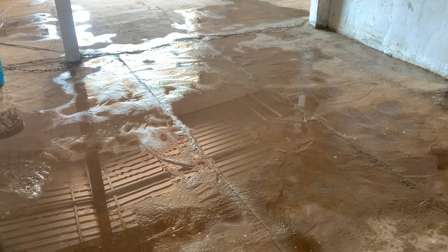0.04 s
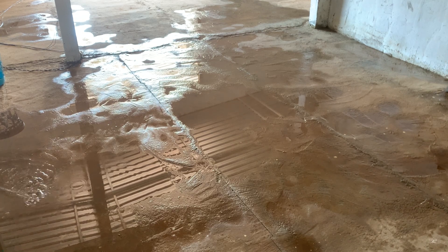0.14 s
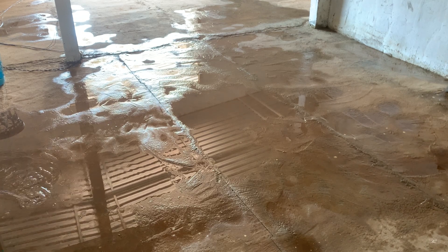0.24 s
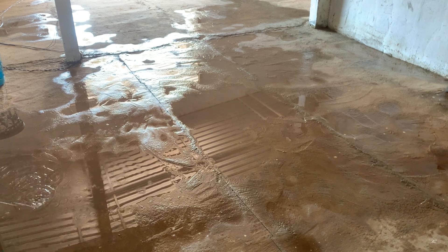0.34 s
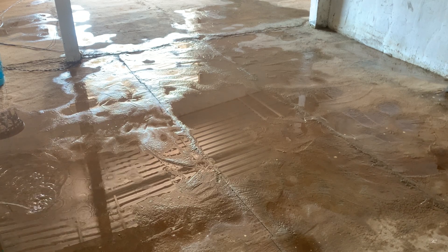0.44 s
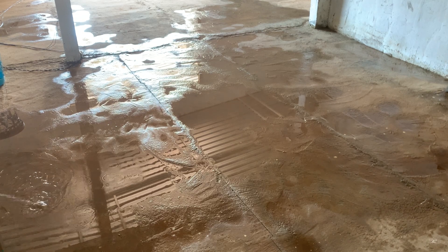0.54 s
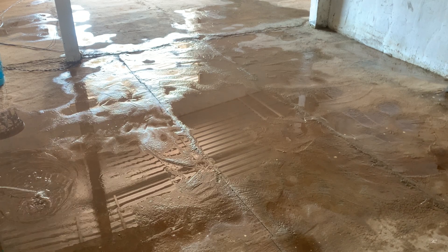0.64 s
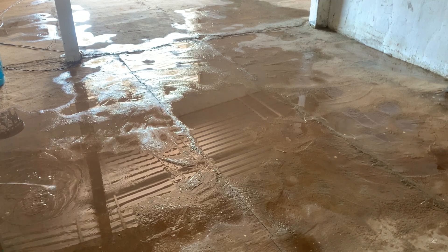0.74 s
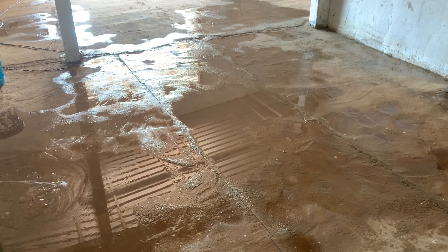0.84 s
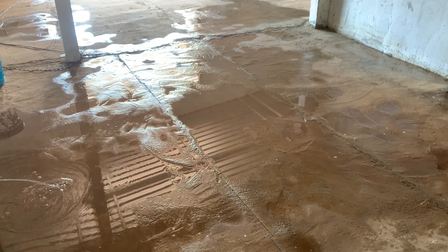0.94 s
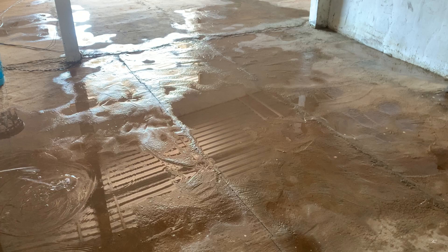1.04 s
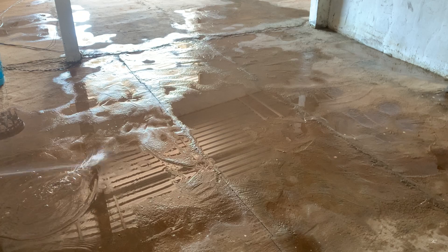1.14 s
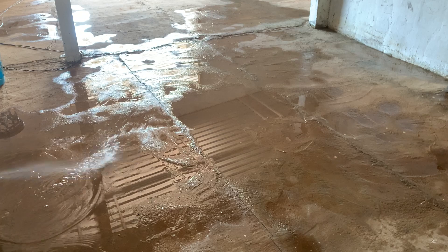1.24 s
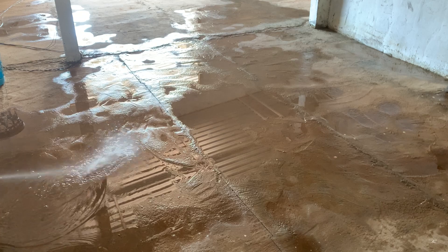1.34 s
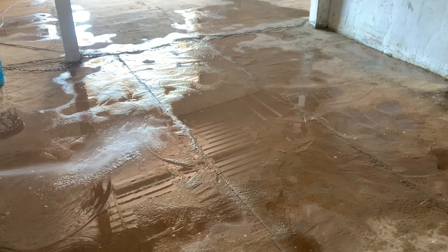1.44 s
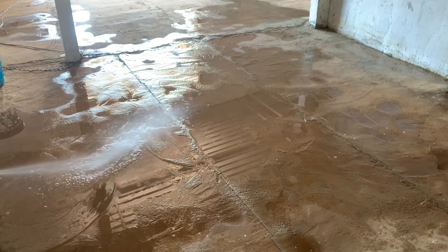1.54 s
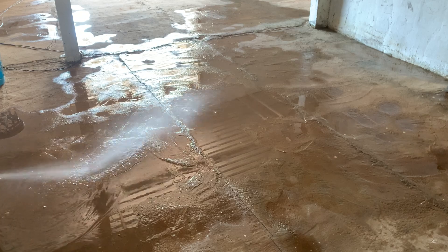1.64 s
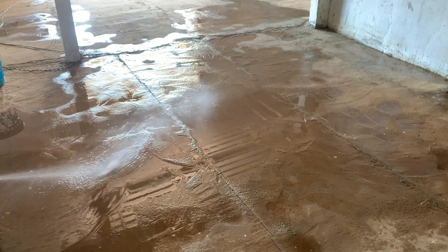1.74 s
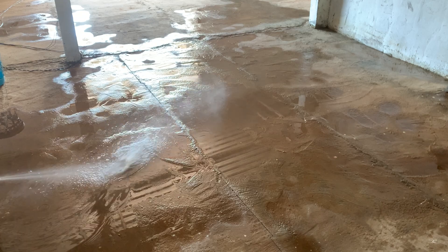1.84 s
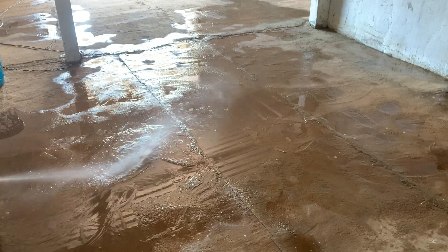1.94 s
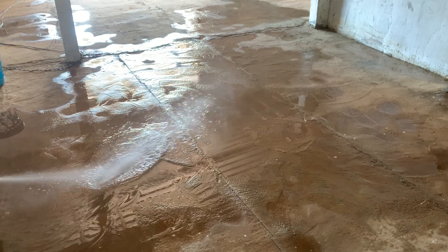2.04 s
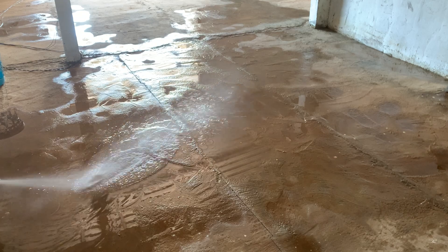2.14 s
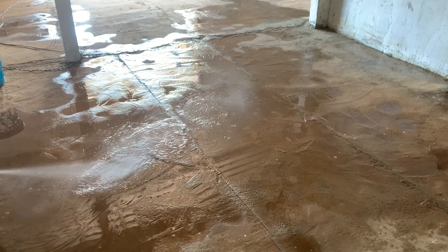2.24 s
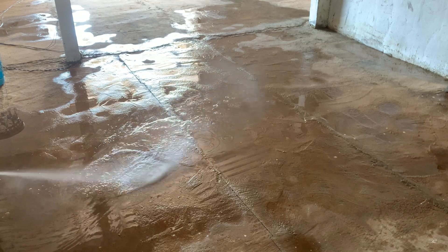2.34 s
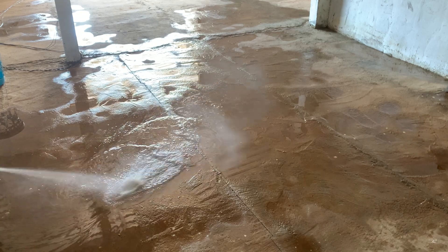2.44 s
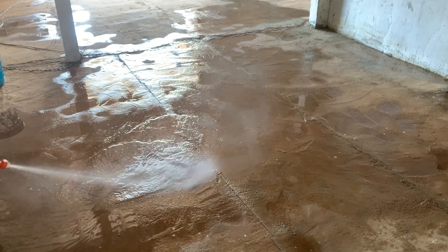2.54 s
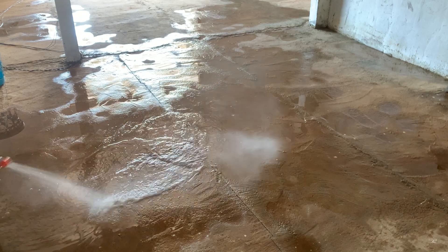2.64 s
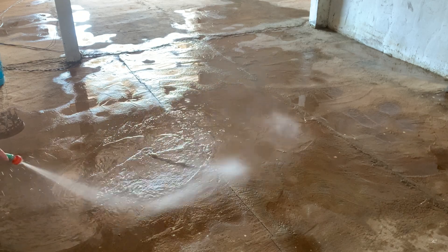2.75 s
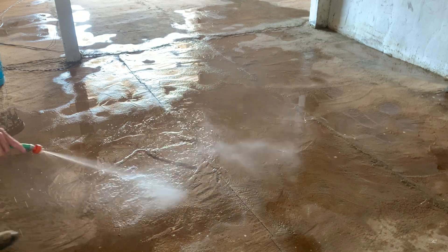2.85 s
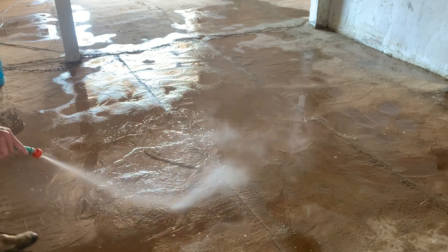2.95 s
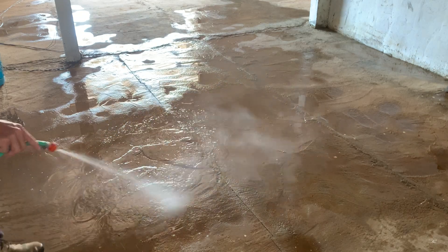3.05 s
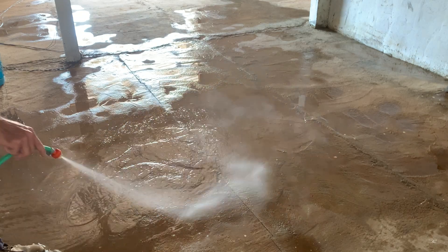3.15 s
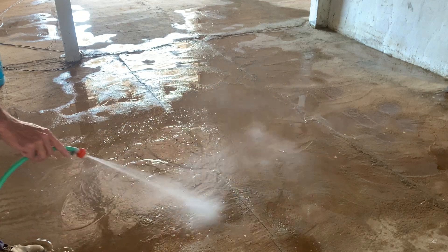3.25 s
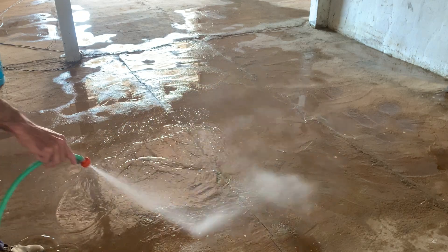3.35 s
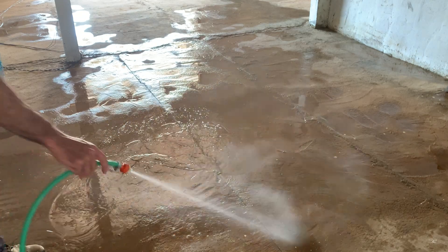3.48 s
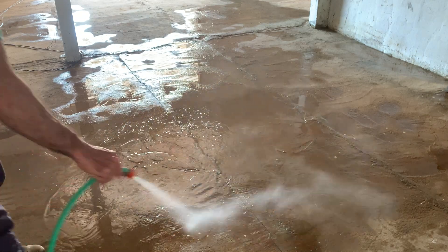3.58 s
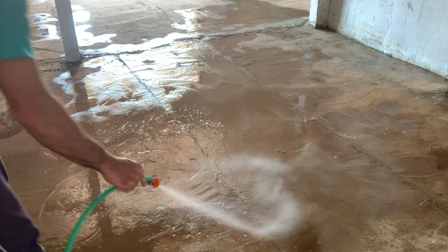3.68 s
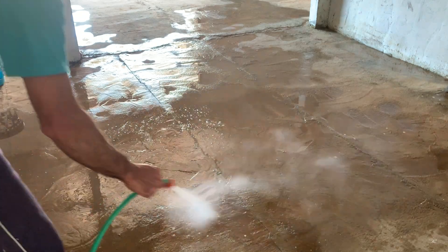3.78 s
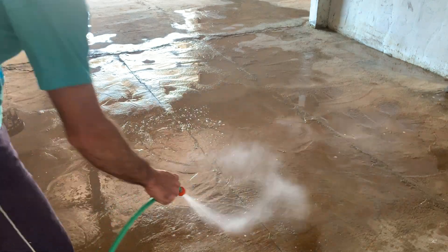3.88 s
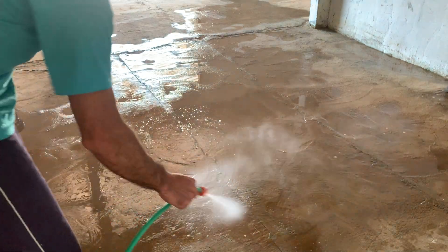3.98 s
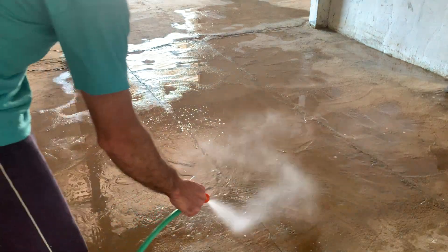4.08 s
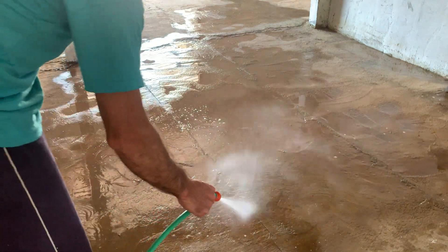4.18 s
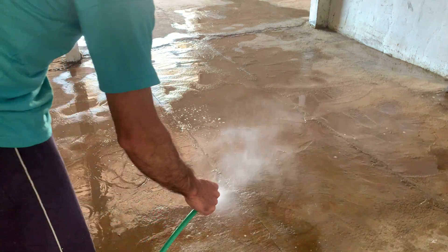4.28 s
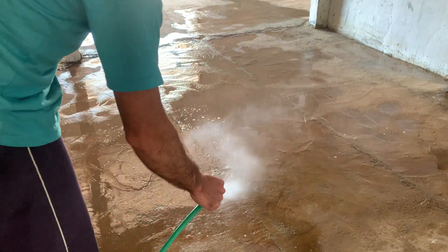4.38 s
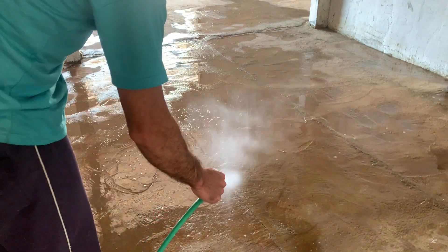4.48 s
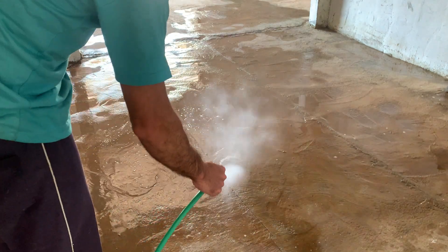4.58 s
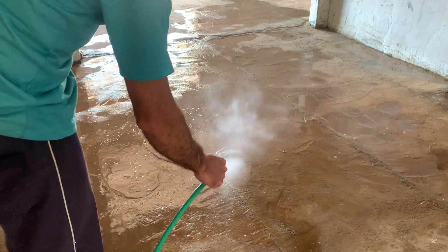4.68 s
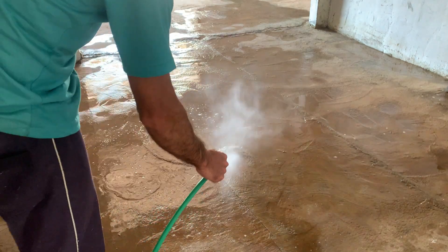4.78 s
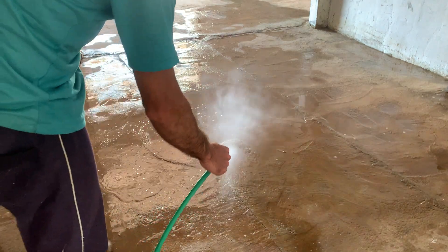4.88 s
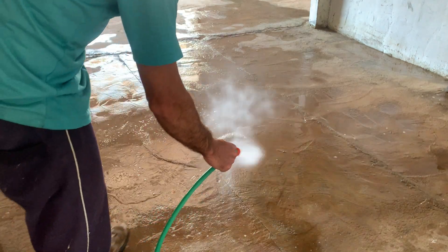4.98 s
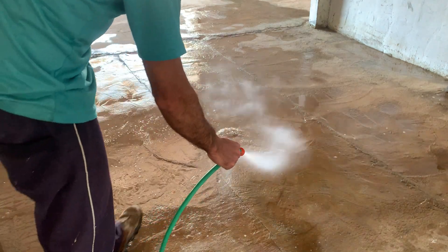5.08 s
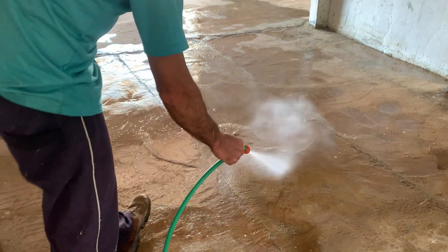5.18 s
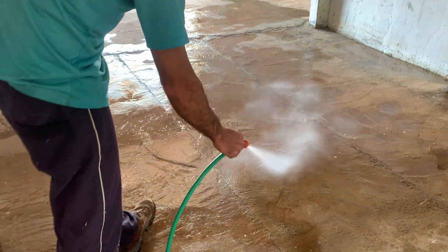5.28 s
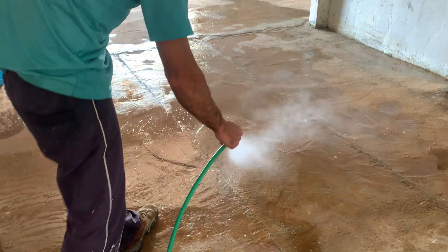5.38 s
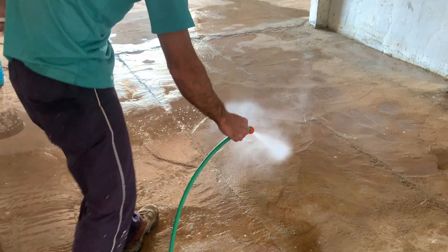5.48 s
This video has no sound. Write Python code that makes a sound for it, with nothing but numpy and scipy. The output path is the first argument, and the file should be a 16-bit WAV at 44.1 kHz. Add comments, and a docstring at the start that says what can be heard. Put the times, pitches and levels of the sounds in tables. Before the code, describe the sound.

Water dribbles and ticks on a wet concrete floor, then a pressure washer kicks in, whines up and blasts a steady hissing jet.

```python
"""Water dribbles and ticks on a wet concrete floor over low rumble and a dying hiss; then a pressure washer starts.
Dribble and jet are random impulse showers through spectral filters; drops and spits are ringing noise bursts.
Pump and motor tones are sines on one shaft-speed curve, with filtered noise for churning water and casing rush.
The jet hisses, sizzles and spits; short reflections comb the steady noise, decaying noise echoes the dribble and drops."""
import sys
import numpy as np
from scipy import signal
from scipy.fft import rfft, irfft, next_fast_len
from scipy.io import wavfile
from scipy.ndimage import map_coordinates

SR = 44100
rng = np.random.default_rng(int(sys.argv[2]) if len(sys.argv) > 2 else 0)


def generate_wav(signal):
    """Clip the signal to [-1, 1] and save it as 16-bit WAV at the path in sys.argv[1]."""
    frames = np.transpose(np.atleast_2d(signal))
    scaled = np.clip(frames, -1, 1) * 32767
    pcm = np.round(scaled).astype(np.int16)
    wavfile.write(sys.argv[1], SR, pcm)


N = 243431
T = np.arange(N) / SR

# Dribble on wet floor: (frequency [Hz], relative density [dB/Hz])
DRIBBLE_SPECTRUM = [(300, -13), (1000, 0), (2400, 2.5), (4000, 5.5), (5200, 2), (7500, 3.5), (10500, 2),
                    (14000, -17), (15000, -30)]
# Hiss dying away: (frequency [Hz], relative density [dB/Hz])
FADING_SPECTRUM = [(40, -15), (130, -6), (300, 9), (450, 4.5), (700, 2.5), (1200, -1.5), (2800, 0),
                   (4200, -2.5), (6000, -17), (12000, -18)]
# Water swishing over the floor: (frequency [Hz], relative density [dB/Hz])
SWISH_SPECTRUM = [(120, -7), (300, 5), (450, 4), (800, 0), (1200, -3), (1600, -5), (2100, -24), (6000, -35)]
# Building rumble: (frequency [Hz], relative density [dB/Hz])
RUMBLE_SPECTRUM = [(12, -40), (25, -21), (42, -7), (62, 5.5), (95, -6), (170, -9), (290, -18), (450, -28),
                   (4000, -49)]
# Single drops: (time [s], direct peak [dB], pitch [Hz], filter width [Hz], excitation decay [s])
DROP_EVENTS = [(.181, -35, 9500, 9000, .0008), (.258, -42, 7000, 6000, .001),
               (.361, -30.5, 8000, 11000, .0008), (.418, -38.5, 5000, 2000, .003),
               (.425, -43, 12000, 7000, .0005), (.491, -44, 10000, 6000, .0005),
               (.529, -45, 5000, 2000, .002), (.602, -44, 7500, 3000, .001), (.625, -42, 9500, 8000, .0005),
               (.682, -39, 4800, 3500, .002), (.729, -33, 5400, 2200, .002), (.731, -38, 9000, 6000, .0015),
               (.869, -44, 4500, 2500, .003), (.879, -43, 13100, 5000, .0008),
               (1.011, -31, 10000, 5000, .001)]
# Nozzle spits: (time [s], direct peak [dB], pitch [Hz], excitation decay [s])
SPIT_EVENTS = [(1.123, -24.5, 13600, .02), (1.143, -20, 13800, 0.043), (1.177, -17, 13200, 0.049),
               (1.55, -24, 12000, 0.038), (1.674, -20, 12980, .018), (1.732, -19, 11500, 0.024),
               (2.175, -26, 11000, .04), (2.348, -11.5, 11600, 0.0067), (2.362, -19.5, 11270, 0.034),
               (2.49, -25, 10510, .04), (2.69, -25, 12000, .02)]
# Pump shaft speed: (time [s], speed [turns/s])
PUMP_SPEED = [(.93, 29.46), (1.0, 49.54), (1.15, 60), (1.3, 66.26), (1.43, 70.54), (1.64, 73.46),
              (1.9, 72.86), (2.35, 72.92), (2.9, 73.4), (5.52, 73.52)]
# Piston hum at shaft multiples 1, 2, 3: (time [s], first [dB], second [dB], third [dB])
HUM_LEVELS = [(.95, -58, -49, -47), (1.12, -44, -45, -55), (1.23, -38, -48, -55), (1.31, -31, -43, -53),
              (1.39, -27, -35, -41), (1.47, -26.5, -31, -53), (1.57, -33, -32.5, -44),
              (1.66, -30.5, -32, -39), (1.75, -27, -34.5, -38), (1.9, -28, -32.5, -35.5),
              (2.03, -29.5, -40, -38), (2.1, -28.5, -38, -42), (2.36, -28, -35, -37.5),
              (2.85, -29, -38, -32.5), (4.1, -28, -37.5, -34.5), (4.8, -29, -42, -36.5),
              (4.97, -29.5, -47, -35), (5.15, -28.5, -38, -35.5), (5.52, -29.5, -43, -34.5)]
# Pump and gear tones: (multiple of pump shaft, relative level [dB])
PUMP_TONE_LEVELS = [(4, -42), (14 / 3, -40), (5, -40), (6, -41), (7, -40.5), (7.35, -46), (7.75, -45),
                    (9.25, -44), (12, -46), (21.1, -40), (23.7, -47), (36.6, -47), (37.65, -48)]
# Water churning in the pump housing: (frequency [Hz], relative density [dB/Hz])
HOUSING_SPECTRUM = [(20, -45), (50, -42), (110, -13.5), (205, -11.5), (275, -4), (370, -6), (450, -1.5),
                    (570, -4.5), (720, -3.5), (930, -15), (1400, -21), (3000, -71)]
# Motor overtones: (multiple of motor shaft, relative level [dB])
MOTOR_TONE_LEVELS = [(1, -36), (3, -36), (5, -40.5)]
# Strongest whine, 4 x motor shaft: (time [s], level before flutter [dB])
WHINE_LEVEL = [(.95, -68), (1.4, -37), (2.0, -35), (2.3, -41), (2.7, -31), (3.05, -37), (3.5, -35),
               (3.72, -31), (4.3, -33.5), (4.52, -40), (4.75, -27), (5.1, -35), (5.52, -33.5)]
# Motor casing resonances: (frequency [Hz], nominal width before widening [Hz], relative level [dB])
CASING_MODES = [(1129, 166, -3.5), (1380, 160, -0.5), (1542, 240, -3.5), (1700, 224, -5), (1900, 130, -8),
                (2442, 323, -5.5), (2800, 400, -6), (3510, 1540, -18), (4170, 850, -10.5)]
# Jet as the hall returns it: (frequency [Hz], relative density [dB/Hz])
WASH_SPECTRUM = [(400, 0), (900, 4.5), (2000, 2), (3500, -5), (4800, 2.5), (6300, 2), (8000, 1),
                 (10000, -5.5), (12000, -44), (15500, -81)]
# Jet arriving straight: (frequency [Hz], relative density [dB/Hz])
HISS_SPECTRUM = [(1000, -11), (2500, -12), (5000, -7), (7200, -7), (8600, 5.5), (10200, 2.5), (11500, -4.5),
                 (13000, 1), (14200, -3), (15000, -45)]
# Finest spray of the jet: (frequency [Hz], relative density [dB/Hz])
MIST_SPECTRUM = [(8000, -32), (10500, 16), (14100, 6), (15000, -40)]
# Brief gear tones: (time [s], multiple of pump shaft, level [dB], half length to 1/e [s])
FLARE_EVENTS = [(1.324, 6, -25.5, 0.035), (1.377, 5, -29, 0.084), (1.41, 6.33, -27, 0.025),
                (1.388, 4, -31, 0.072), (1.48, 4.75, -26, .05), (1.597, 5.33, -28.5, 0.11),
                (1.736, 5, -26.5, 0.069), (2.02, 5, -27.5, 0.051), (2.368, 4, -32, 0.053),
                (2.597, 5.33, -32, 0.095), (2.733, 6, -29.5, 0.066), (2.74, 7, -30, .06),
                (3.149, 5.33, -34, .05), (3.425, 5.33, -29, 0.055), (3.72, 5.33, -34, 0.054),
                (3.847, 4.67, -33, .08), (4.008, 6, -26, 0.026), (4.09, 16, -27, 0.065),
                (4.162, 5.33, -30, 0.044), (4.38, 4.67, -29.5, 0.045), (4.774, 7.7, -26, 0.032),
                (4.935, 5, -29.5, 0.05), (5.167, 6, -31, .06), (5.44, 6, -31, 0.051),
                (5.447, 5, -30, 0.052)]
# Left port over right port: (frequency [Hz], level difference [dB])
PORT_BALANCE_DB = [(110, -3.5), (380, -2.5), (700, 0.5), (2400, 0.6), (4400, 1), (8100, -3), (15000, 1)]

# Dribble thins to a trickle; levels before port gains
TRICKLE_DB, DRAIN_EXTRA_DB, DRAIN_S = -56.5, 9, 0.17
# Last hiss holds, then dies away
FADING_DB, FADING_HOLD_S, FADING_DB_PER_S = -43.5, 0.045, 53
SWISH_S, SWISH_DB, SWISH_DECAY_S = 0.74, -54, 0.32
# Rumble settles to RUMBLE_DB
RUMBLE_DB, RUMBLE_EXTRA_DB, SETTLE_S, SETTLE_LENGTH_S = -50.5, 2, 0.82, .1
START_S = 0.933
# Washer labours filling the hose, eases, then its pressure sags briefly
EASE_S, EASE_LENGTH_S = 1.94, 0.077
SAG_S, SAG_HALF_S = 2.19, 0.18
# Jet catches and throws mist; grazes the floor until tipped down
CATCH_S, CATCH_LENGTH_S = 1.1, .06
TIP_S, TIP_LENGTH_S = 2.62, .3
GEAR_RATIO = 16 / 3  # motor turns per pump turn
HUNT_SHARE, HUNT_RATE_HZ = .006, 24  # motor speed wander
REFLECTION_MAX_S, REFLECTIONS_DB = .02, -7  # longest delay, joint level
PORT_LAG_SAMPLES, PUDDLE_LAG_SAMPLES = 13, 8  # right port after left
TOP_HZ = 15400


def undb(db):
    """Decibels to amplitude gain."""
    return 10 ** (np.asarray(db) / 20)


def unit(x):
    """Scale to rms 1."""
    return x / np.sqrt(np.mean(x ** 2))


def curves(table):
    """Table columns interpolated linearly in time."""
    time_s, *columns = np.transpose(table)
    return [np.interp(T, time_s, column) for column in columns]


def fall(at_s, length_s):
    """Ramp from 1 to 0, centred on at_s."""
    return np.clip(.5 - (T - at_s) / length_s, 0, 1)


def bump(at_s, half_s):
    """Gaussian swell from 0 to 1 and back."""
    return np.exp(-((T - at_s) / half_s) ** 2)


def walk(rate_hz):
    """Smooth random wander, spread near 1, rate_hz knots per second."""
    return map_coordinates(rng.standard_normal(1024), [(T * rate_hz) % 1023], order=2, mode="wrap")


def colour(x, spectrum):
    """Filter by a spectrum joined over log frequency; rms 1."""
    hz, db = np.transpose(spectrum)
    size = next_fast_len(N)
    bins_hz = np.maximum(np.arange(size // 2 + 1) * SR / size, 1)
    gain = undb(np.interp(np.log(bins_hz), np.log(hz), db))
    return unit(irfft(rfft(x, size) * gain, size)[..., :N])


def ring(x, hz, width_hz):
    """Resonance with steep skirts: one peak filter applied twice."""
    b, a = signal.iirpeak(min(hz, SR / 2 - 1000), hz / width_hz, fs=SR)
    return signal.lfilter(b, a, signal.lfilter(b, a, x))


def air():
    """Unrelated white noise at the two microphone ports."""
    return rng.standard_normal((2, N))


def diffuse(pair):
    """Long waves reach both ports alike; short ones are unrelated."""
    mid = (pair[0] + pair[1]) / 2
    side = (pair[0] - pair[1]) / 2
    side = signal.sosfilt(signal.butter(1, 480, "high", fs=SR, output="sos"), side)
    return np.array([mid + side, mid - side])


def direct(x, lag_samples=PORT_LAG_SAMPLES):
    """Sources stand to the left, so the right port hears them later."""
    return np.array([x, np.pad(x, (lag_samples, 0))[:N]])


def hall(x, t60_s):
    """Diffuse echo of concrete walls: decaying noise, different at each port."""
    tail = rng.standard_normal((2, SR)) * np.exp(-np.log(1000) * T[:SR] / t60_s)
    tail /= np.sqrt(np.sum(tail ** 2) / 2)
    return signal.fftconvolve(x[None], tail, axes=1)[:, :N]


def reflected(pair, count=12):
    """Hard floor and near walls comb the sound differently at each port; expected power is kept."""
    out = pair.copy()
    gain = undb(REFLECTIONS_DB) / np.sqrt(count)
    for port in range(2):
        shares = rng.uniform(.1, 1, count)
        signs = rng.choice([-1, 1], count)
        for share, sign in zip(shares, signs):
            delay_samples = int(share * REFLECTION_MAX_S * SR)
            out[port] += sign * gain * np.pad(pair[port], (delay_samples, 0))[:N]
    return out / np.sqrt(1 + undb(REFLECTIONS_DB) ** 2)


def churn(x, depth, rate_hz, width_hz):
    """Turbulence: patches of the spectrum swell and sink independently; rms 1."""
    hz, time_s, bins = signal.stft(x, SR, nperseg=1024)
    place = np.meshgrid(hz / width_hz, time_s * rate_hz, indexing="ij")
    patches = map_coordinates(rng.standard_normal((400, 400)), place, order=1, mode="wrap")
    patches_db = 1.78 * depth * patches
    return unit(signal.istft(bins * undb(patches_db), SR)[1][..., :N])


def droplets(per_second, spread_db):
    """Random impulse shower, most impacts weak and a few strong; rms 1."""
    hit = rng.random(N) < per_second / SR
    size = undb(spread_db * np.minimum(rng.exponential(size=N), 5))
    return unit(hit * size * rng.choice([-1, 1], N))


def dribble():
    """Slack hose patters on the puddle as the last hiss dies; water swishes before the start."""
    patter_db = TRICKLE_DB + DRAIN_EXTRA_DB * np.exp(-T / DRAIN_S)
    patter = colour(droplets(1100, 3.7), DRIBBLE_SPECTRUM) * undb(patter_db)
    patter_ports = undb(-4.5) * direct(patter, PUDDLE_LAG_SAMPLES) + undb(-1.5) * hall(patter, t60_s=0.55)
    fading_db = FADING_DB - FADING_DB_PER_S * np.maximum(T - FADING_HOLD_S, 0)
    fading_db -= 3.9 * fall(at_s=0.015, length_s=.04)  # softer at the very beginning
    fading = colour(diffuse(air()), FADING_SPECTRUM) * undb(fading_db)
    decay = np.exp(-np.maximum(T - SWISH_S, 0) / SWISH_DECAY_S)
    swell = (1 - fall(SWISH_S, length_s=.015)) * decay
    swish = undb(SWISH_DB) * swell * colour(diffuse(air()), SWISH_SPECTRUM)
    return patter_ports + fading + swish


def rumble():
    """Low building rumble in soft uneven bumps, nearly alike at both ports."""
    level_db = RUMBLE_DB + RUMBLE_EXTRA_DB * fall(SETTLE_S, SETTLE_LENGTH_S) + 3 * walk(16)
    return undb(level_db) * colour(diffuse(air()), RUMBLE_SPECTRUM)


def splash(at_s, peak_db, hz, width_hz, decay_s):
    """Sharp-fronted water burst: decaying noise rings a resonance."""
    t = T[:SR // 5]
    burst = ring(rng.standard_normal(len(t)) * np.exp(-t / decay_s), hz, width_hz)
    burst *= undb(peak_db) / np.abs(burst).max()
    return np.pad(burst, (int(at_s * SR), N))[:N]


def splashes():
    """Drops tick in the puddle; the pump kicks, first water gushes, and the nozzle spits."""
    drops = sum(splash(*drop) for drop in DROP_EVENTS)
    kick = splash(at_s=.934, peak_db=-29, hz=520, width_hz=700, decay_s=0.02)
    splutter = splash(at_s=0.948, peak_db=-29.5, hz=1400, width_hz=1500, decay_s=.08)
    gush = splash(at_s=.962, peak_db=-30, hz=5600, width_hz=11000, decay_s=0.014)
    thump = splash(at_s=0.97, peak_db=-27, hz=370, width_hz=170, decay_s=0.034)
    spits = sum(splash(at_s, db, hz, 5600, decay_s) for at_s, db, hz, decay_s in SPIT_EVENTS)
    puddle = direct(drops + gush, PUDDLE_LAG_SAMPLES)
    machine = direct(kick + thump + splutter + spits)
    return puddle + machine + undb(1.0) * hall(drops + .21 * spits, t60_s=0.43)


def effort(run_db, rise_db, rise_s, labour_db, sag_db):
    """Level [dB] climbing with pressure, offset while labouring, dipping (or swelling if sag_db < 0), then steady."""
    age_s = np.maximum(T - START_S, 0)
    climb_db = run_db - rise_db * np.exp(-age_s / rise_s)
    return climb_db + labour_db * fall(EASE_S, EASE_LENGTH_S) - sag_db * bump(SAG_S, SAG_HALF_S)


def tones(turns, table, waver, rate_hz):
    """Shaft tones; each swells and sinks as the hall's reflections shift."""
    out = np.zeros((2, N))
    place = T * rate_hz * 16  # 16 interpolated points per random knot
    for multiple, db in table:
        fading = signal.resample_poly(rng.standard_normal((2, 2, 600)), 16, 1, axis=2)
        drift = np.array([np.interp(place, np.arange(len(re)), re + 1j * im) for re, im in fading])
        carrier = direct(np.exp(2j * np.pi * (multiple * turns + rng.random())))
        wavering = np.real((1 + waver * drift) * carrier)
        out += undb(db) * wavering / np.sqrt(.5 + waver ** 2)
    return out


def hum(turns):
    """Pistons hum at three shaft multiples, booming unevenly during run-up."""
    out = np.zeros(N)
    for multiple, db in enumerate(curves(HUM_LEVELS), 1):
        out += np.sqrt(2) * undb(db) * np.sin(2 * np.pi * multiple * turns)
    return out


def pump(turns):
    """Pistons hum, gears whirr, water churns through valves and the housing drones."""
    strokes = 1 + 0.035 * np.sin(2 * np.pi * turns)
    flow = diffuse(air()) + 0.57 * direct(rng.standard_normal(N))
    gurgle = churn(colour(flow * strokes, HOUSING_SPECTRUM), depth=2.5, rate_hz=16, width_hz=50.25)
    gurgle_db = effort(run_db=-27.5, rise_db=24.0, rise_s=0.093, labour_db=2.5, sag_db=-1.5) + .5 * walk(7)
    drone = unit(ring(diffuse(air()) * strokes, hz=382, width_hz=180))
    drone_db = effort(run_db=-35.5, rise_db=9, rise_s=0.16, labour_db=4.5, sag_db=-3)
    whirr = tones(turns, PUMP_TONE_LEVELS, waver=0.65, rate_hz=12)
    whirr_db = effort(run_db=2.5, rise_db=43, rise_s=0.11, labour_db=1.0, sag_db=2.0)
    return direct(hum(turns)) + gurgle * undb(gurgle_db) + drone * undb(drone_db) + whirr * undb(whirr_db)


def whine(motor_turns, port_angle_rad=1.5, flutter_db=3.0):
    """Strongest whine: one fluttering line off the walls, out of step between ports."""
    phase = 2 * np.pi * 4 * motor_turns
    flutter = np.array([walk(22), walk(22)])
    level_db = curves(WHINE_LEVEL)[0] + flutter_db * flutter
    return np.sqrt(2) * undb(level_db) * np.sin([phase, phase - port_angle_rad])


def motor(turns):
    """Motor whines, hunting in pitch; fan and gears excite the casing, louder once the pump loads it."""
    rush = np.zeros((2, N))
    for hz, width_hz, db in CASING_MODES:
        noise = air() + 0.58 * direct(rng.standard_normal(N))
        rush += undb(db) * ring(noise, hz, 1.66 * width_hz)
    rush = reflected(churn(unit(rush), depth=2.0, rate_hz=24, width_hz=40))
    unloaded = fall(at_s=1.13, length_s=0.22)
    rush_db = effort(run_db=-22.5, rise_db=31.5, rise_s=0.11, labour_db=1.1, sag_db=1.0) - 6 * unloaded
    hunting = 1 + HUNT_SHARE * walk(HUNT_RATE_HZ)
    motor_turns = GEAR_RATIO * np.cumsum(np.gradient(turns) * hunting)
    overtones = tones(motor_turns, MOTOR_TONE_LEVELS, waver=1.6, rate_hz=18)
    overtones_db = effort(run_db=-0.5, rise_db=31, rise_s=0.13, labour_db=-0.5, sag_db=4.0)
    return rush * undb(rush_db) + overtones * undb(overtones_db) + whine(motor_turns)


def jet():
    """Dense droplets hiss on the floor, heavy ones slap it, and fine mist sizzles above."""
    grazing = fall(TIP_S, TIP_LENGTH_S)
    caught = 1 - fall(CATCH_S, CATCH_LENGTH_S)
    flow_db = effort(run_db=-35.5, rise_db=22.5, rise_s=0.16, labour_db=1.1, sag_db=0.7) - 2.5 * (1 - caught)
    jet_db = flow_db + 1.0 * grazing + 0.24 * walk(6)
    mist_db = flow_db - 15.5 + 7 * caught + grazing * (3.3 + 1.8 * walk(14.6))
    flutter_db = .5 * walk(44)
    hiss = churn(colour(droplets(7000, 1.8), HISS_SPECTRUM), depth=1.0, rate_hz=26, width_hz=100)
    hiss *= undb(jet_db + flutter_db - 2.5)
    mist = churn(colour(droplets(8300, 2.5), MIST_SPECTRUM), depth=3.5, rate_hz=24, width_hz=130)
    mist *= undb(mist_db + flutter_db)
    slaps = unit(ring(droplets(140, 2.5), hz=4800, width_hz=4500)) * undb(jet_db - 5)
    wash = churn(colour(air(), WASH_SPECTRUM), depth=2.0, rate_hz=22, width_hz=90)
    wash *= undb(flow_db + 4 + 1.2 * grazing)
    return reflected(direct(hiss + mist + slaps) + wash)


def shudder(at_s=1.21, half_s=0.16, db=-37):
    """Machine shudders on its feet during run-up: a swell of low resonant noise."""
    return undb(db) * bump(at_s, half_s) * unit(ring(diffuse(air()), hz=112, width_hz=38))


def valve(at_s=1.024, song_db=-37.0, song_rise_s=0.023, linger_db=-39, linger_rise_s=0.077):
    """Valve sings as pressure builds, then lingers as a broader hiss; both are resonant noise."""
    age_s = np.maximum(T - at_s, 0)

    def swell(peak_s):
        """Rise to 1 at peak_s, then decay."""
        return age_s / peak_s * np.exp(1 - age_s / peak_s)

    song = unit(ring(air() + direct(rng.standard_normal(N)), hz=2930, width_hz=260))
    linger = unit(ring(air(), hz=2800, width_hz=580))
    return undb(song_db) * swell(song_rise_s) * song + undb(linger_db) * swell(linger_rise_s) * linger


def flares(turns):
    """Single gear tones stand out briefly, slightly unsteady in pitch."""
    wobble_rad = .5 * walk(30)
    out = np.zeros(N)
    for at_s, multiple, db, half_s in FLARE_EVENTS:
        tone = np.sin(2 * np.pi * multiple * turns + wobble_rad)
        out += np.sqrt(2) * undb(db) * bump(at_s, half_s) * tone
    return direct(out)


def scene():
    """The switch closes; shaft speed drives the tones, and the water follows."""
    speed_hz, = curves(PUMP_SPEED)
    turns = np.cumsum(speed_hz * (1 + .0015 * walk(6))) / SR
    running = np.clip((T - START_S) / 0.0069, 0, 1)
    washer = pump(turns) + motor(turns) + jet() + shudder() + valve() + flares(turns)
    return dribble() + rumble() + splashes() + running * washer


def record(dry):
    """Ports differ a little in colour; the deepest bass and the top are cut."""
    hz, db = np.transpose(PORT_BALANCE_DB)
    size = next_fast_len(N + SR // 10)
    bins_hz = np.maximum(np.arange(size // 2 + 1) * SR / size, 1)
    lean_db = np.interp(np.log(bins_hz), np.log(hz), db) / 2  # half of the difference per port
    ports = irfft(rfft(dry, size) * undb([lean_db, -lean_db]), size)[:, :N]
    ports = signal.sosfilt(signal.butter(2, 33, "high", fs=SR, output="sos"), ports)
    return signal.sosfilt(signal.ellip(8, .2, 70, TOP_HZ, fs=SR, output="sos"), ports)


dry = scene()
out = record(dry)
generate_wav(out)
```